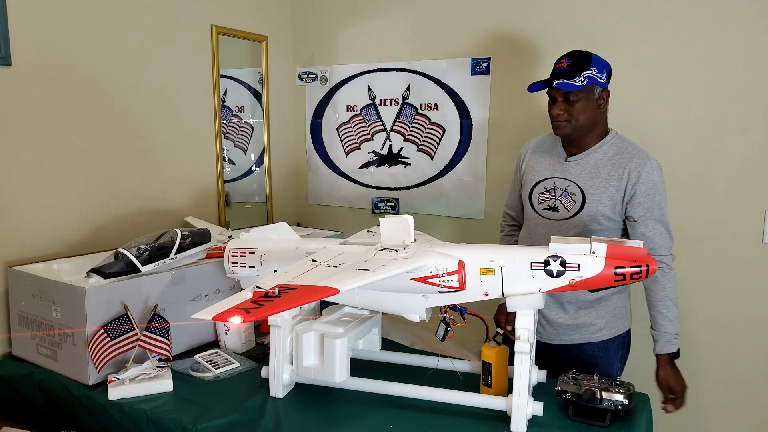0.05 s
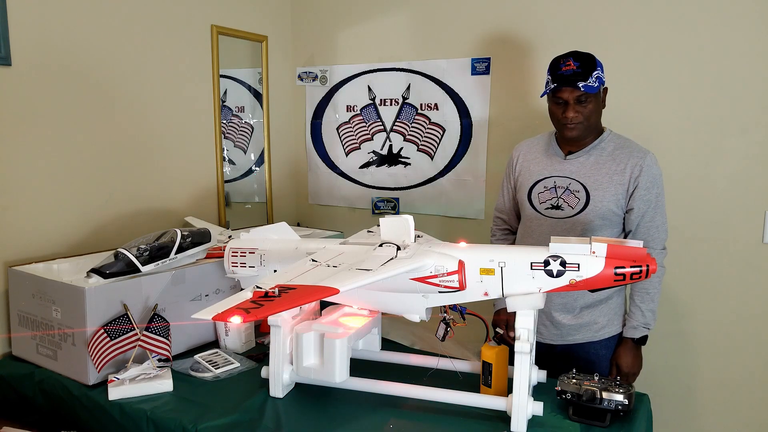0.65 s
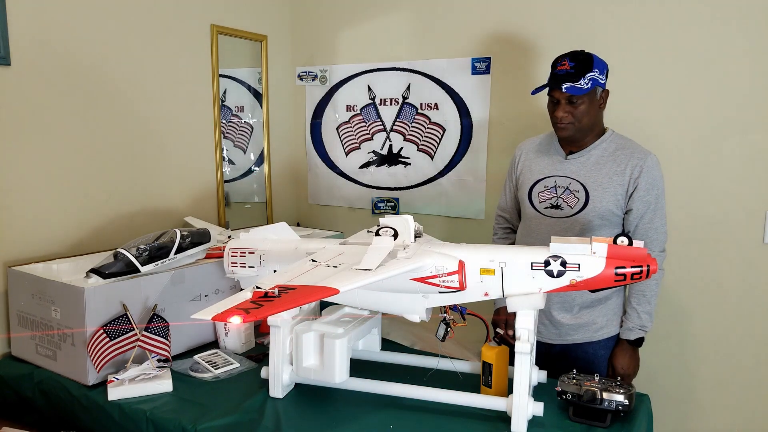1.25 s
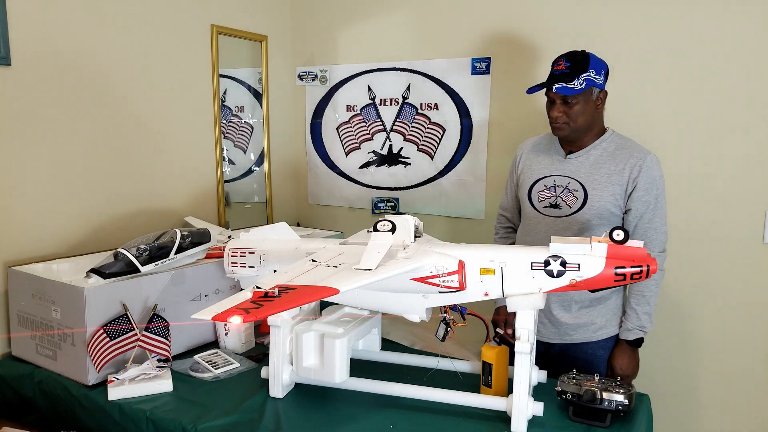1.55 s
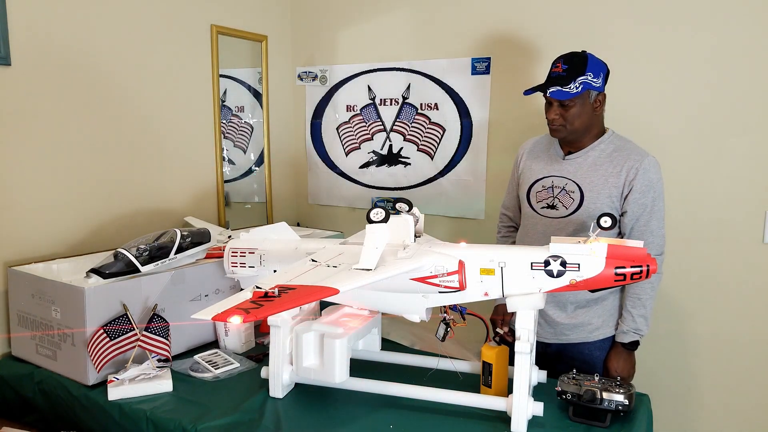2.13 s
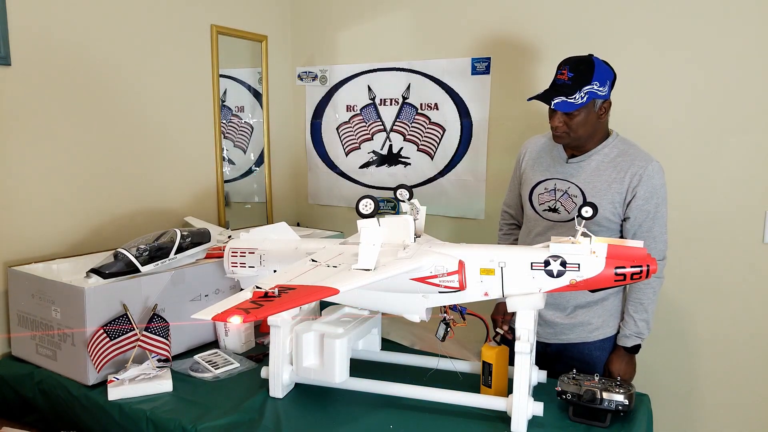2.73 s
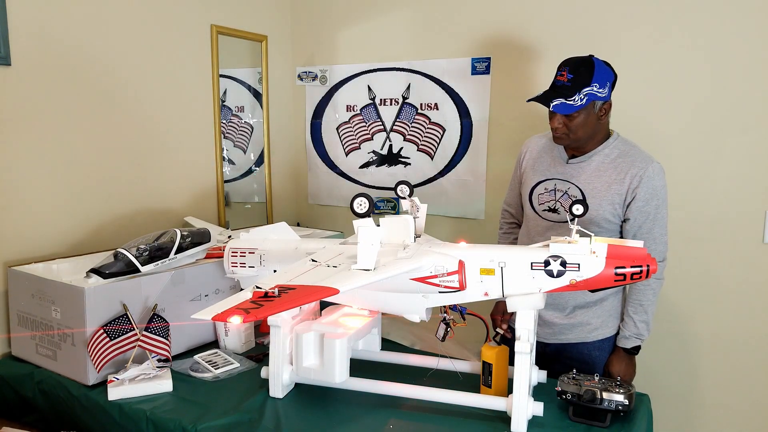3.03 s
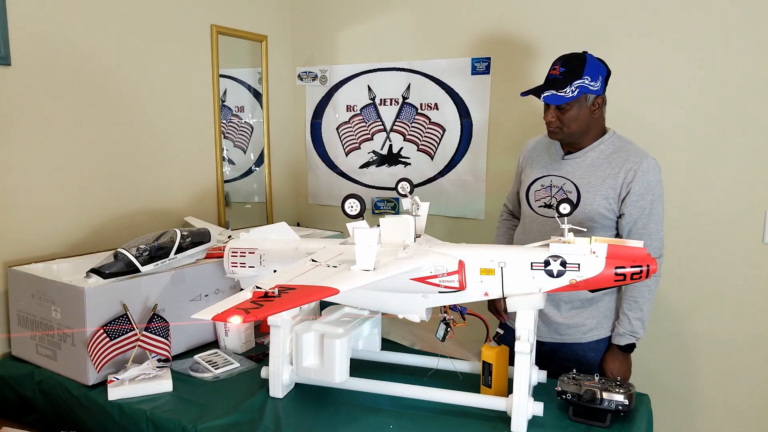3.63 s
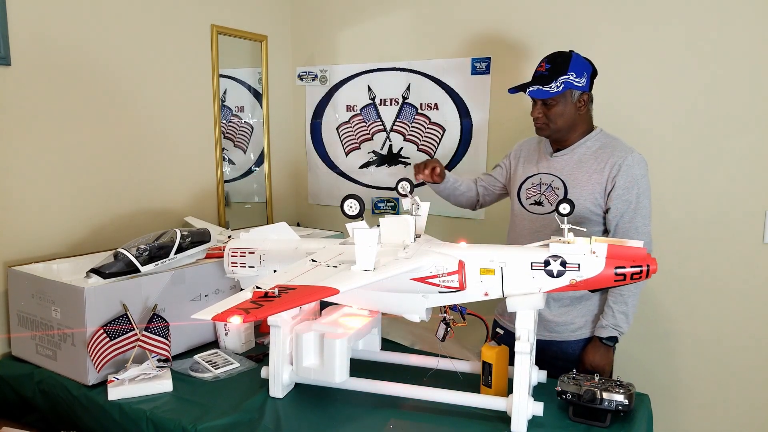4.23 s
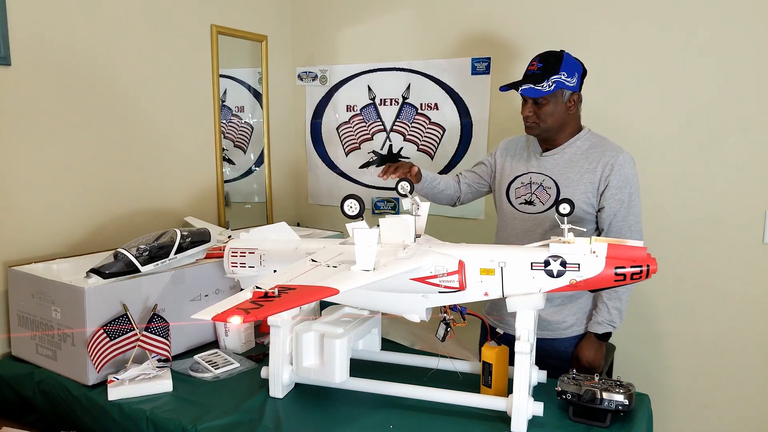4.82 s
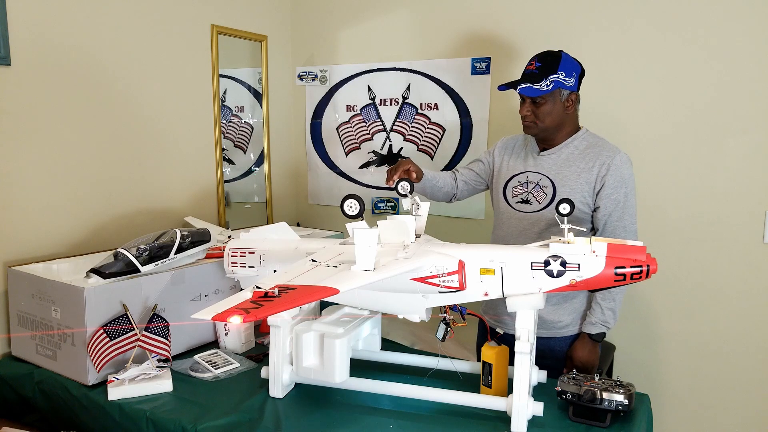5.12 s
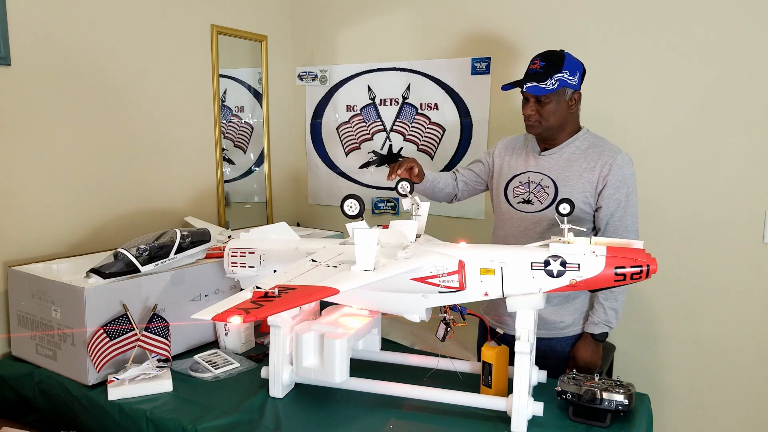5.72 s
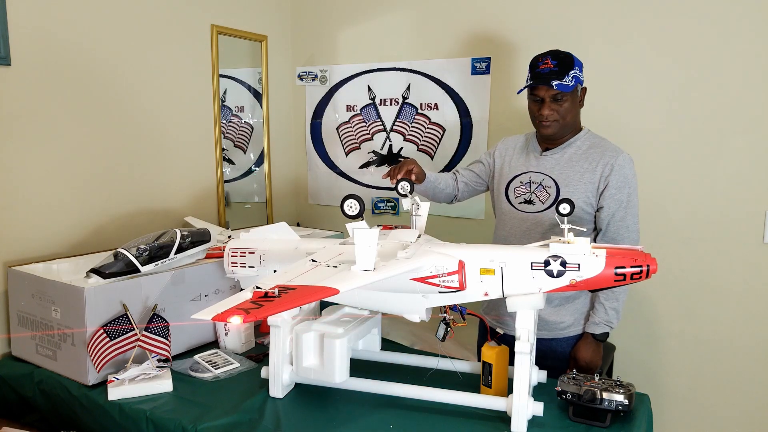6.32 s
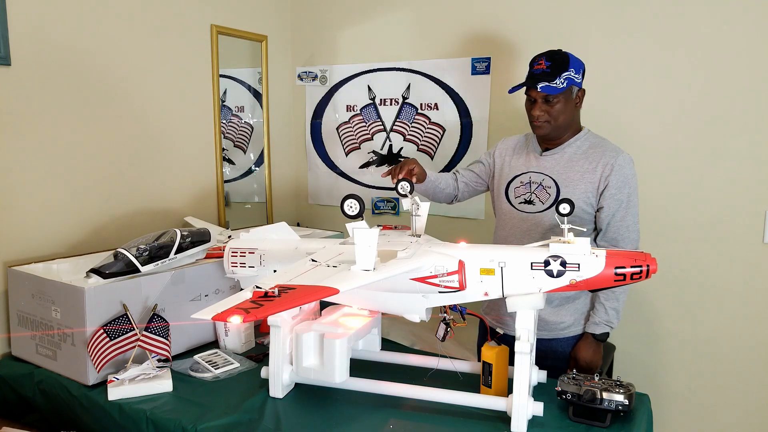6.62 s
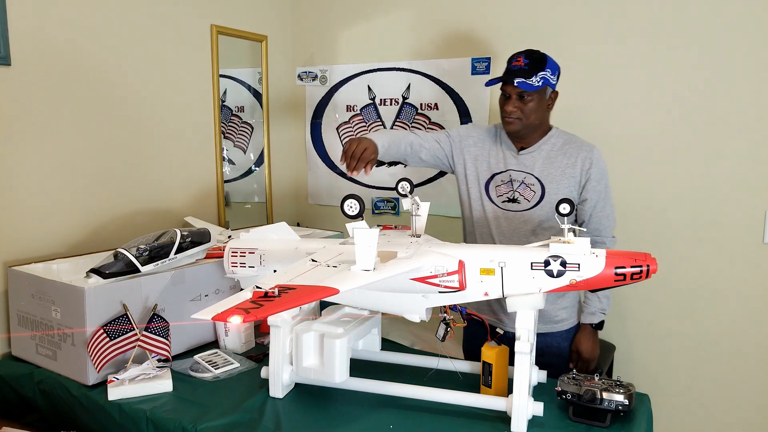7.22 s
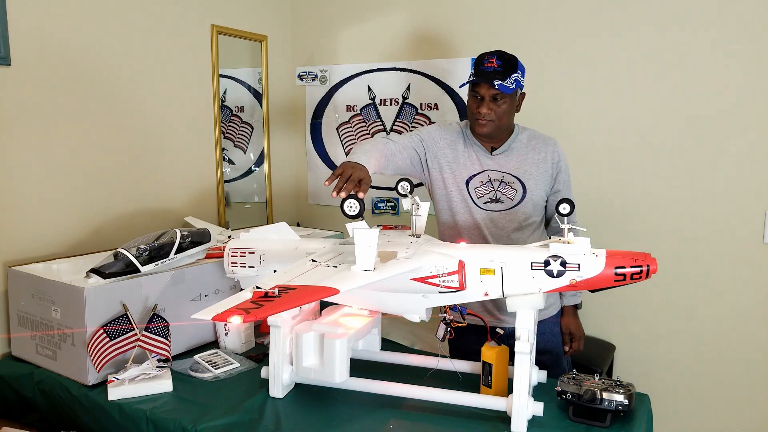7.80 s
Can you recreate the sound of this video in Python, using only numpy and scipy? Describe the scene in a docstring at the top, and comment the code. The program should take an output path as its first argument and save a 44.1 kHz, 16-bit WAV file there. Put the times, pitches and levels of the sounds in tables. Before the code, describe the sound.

In a small room, the landing gear of a foam model plane swings out with a wavering electric whine and a grinding of tiny gears. The motors grow rougher and stop with a scrape and a quick double clack. Next a servo creeps along with a scratchy, pulsing rasp until a door knocks shut. A faint cloth rustle and a light bump follow. The right microphone hears far more than the left.

```python
"""Three small geared motors swing out the legs of a foam model aircraft; their whines beat and sag
under load. The legs scrape home and clack against their stops. A slow servo then rasps as it draws a
gear door shut with a knock; a sleeve rustles and a soft bump follows.
The room is small, and the right microphone hears far more of the aircraft than the left."""
import sys
import numpy as np
from scipy import signal
from scipy.fft import rfft, irfft, next_fast_len
from scipy.io import wavfile
from scipy.ndimage import map_coordinates

SR = 44100
rng = np.random.default_rng(int(sys.argv[2]) if len(sys.argv) > 2 else 0)


def waveform_to_disk(signal):
    """Save audio, clipped to [-1, 1], as 16-bit WAV at the path in sys.argv[1]."""
    frames = np.transpose(np.atleast_2d(signal))
    scaled = np.clip(frames, -1, 1) * 32767
    samples = np.round(scaled).astype(np.int16)
    wavfile.write(sys.argv[1], SR, samples)


N = 351036

# Unloaded shaft speed in Hz, by motor: slow, loud, fast.
IDLE_HZ = {"slow": 333.2, "loud": 340.1, "fast": 354.3}
# Spectrum of a leg rubbing in its mount. Each row: frequency in Hz, relative level in dB.
RUB_SPECTRUM = [(100, -57), (300, -4), (500, -7), (850, -1), (1200, 2), (1600, 0), (2200, -13), (3200, -18),
                (5500, -6), (8000, -41.5)]
FULL_SAG_HZ = 21.5  # mean loss of shaft speed at full load
CUT_S, RUN_DOWN_S = 4.195, 0.081  # motor current is cut


def leg_drives(grind_db=-5, brush_db=-37.0, brush_follow=0.51, hum_db=5, coast_db_per_s=110):
    """Three motors at slightly different speeds beat; their gears grind in time with the shafts."""
    # Gear and motor brush spectra. Each row: frequency in Hz, relative level in dB.
    grind_spectrum = [(150, -25.5), (500, -16.5), (900, -12), (2000, -6.5), (2600, -7.5), (4000, -5),
                      (5800, 2), (6600, -7.5), (8000, -16), (16000, -32)]
    brush_spectrum = [(3000, -48.5), (6500, -5.5), (8000, 0), (9500, 0.5), (12000, 0.5), (14000, 3),
                      (15600, -3)]
    # Envelopes of tooth rattle, shaft hum and its octave. Each row: time in seconds, relative level in dB.
    rattle_levels = [(0.0, -33), (0.44, -32.5), (0.6, -30), (2.58, -24), (3.97, -26), (4.2, -27)]
    hum_levels = [(0.0, -48), (0.85, -42), (1.02, -54), (1.95, -40.5), (2.7, -38), (3.03, -49.5),
                  (3.2, -42.5), (3.9, -44.5), (4.2, -50)]
    octave_levels = [(0, -39.5), (.44, -43), (.55, -50.5), (1.9, -50.5), (2.5, -47), (3.0, -49.5),
                     (3.5, -48), (4.2, -50.5)]
    motors = [motor("slow", flutter=0.0014, orders_db=-0.5, stall_s=4.22),
              motor("loud", flutter=0.0013, orders_db=-1.0, stall_s=4.27),
              motor("fast", flutter=0.0012, orders_db=-1.0, stall_s=4.24)]
    whines, overtones, angles_rad, sags_hz = (np.array(part) for part in zip(*motors))
    tones = whines.sum(0) + filtered(overtones.sum(0), wing_skin)
    load = np.clip(sags_hz.mean(0) / FULL_SAG_HZ, 0, 2)
    shafts = amp([-7, 0, -8]) @ np.cos(angles_rad)
    hum = amp(envelope(hum_levels) + hum_db) * unit(amp(2.0 * wobble(24)) * shafts)
    shaft_octaves = unit(amp([0, -3, -5]) @ np.cos(2 * angles_rad))
    octave = amp(envelope(octave_levels) + 2.3 * wobble(30)) * shaft_octaves
    pressure = (1 + np.cos(angles_rad)) / 2  # teeth press harder once a turn
    contacts = lambda: (pressure ** 2 * rng.standard_normal(pressure.shape)).sum(0)
    rattle_db = envelope(rattle_levels)
    grind = amp(rattle_db + grind_db) * coloured(contacts(), grind_spectrum)
    brush_gain = amp(brush_db + brush_follow * (rattle_db - rattle_db.mean()))
    brushes = brush_gain * coloured(contacts(), brush_spectrum)
    pitched = tones + hum + octave + gear_whistles(angles_rad, load)
    powered = 1 - ramp(CUT_S, RUN_DOWN_S)
    coasting = amp(-coast_db_per_s * since(CUT_S))
    return pitched * powered + grind * coasting + brushes * coasting ** 2


def motor(name, flutter, orders_db, stall_s, jitter=0.0015, waver_db=1.7, mesh_db=2.5, chatter_db=2.0):
    """A three-pole armature whines at three times shaft speed; the gear mesh adds higher orders."""
    # Whine envelope, by motor. Each row: time in seconds, level in dB.
    whine_levels = {"slow": [(0, -24.5), (.38, -24), (.65, -31.5), (.92, -35), (1.12, -38), (1.7, -32.5),
                    (2.0, -30.5), (2.26, -26), (2.6, -37.5), (2.85, -28.5), (3.17, -32), (3.28, -26),
                    (3.88, -27.5), (4.2, -37.5)], "loud": [(0, -34), (.25, -24.5), (.47, -24), (.52, -29),
                    (.553, -14), (.59, -19.5), (.78, -12.5), (1.18, -19.5), (1.38, -16), (1.66, -17.5),
                    (1.87, -16), (2.1, -18), (2.28, -14), (2.43, -21), (2.57, -14.5), (2.77, -22),
                    (3.1, -19.5), (3.3, -21), (3.95, -23.5), (4.005, -13), (4.04, -25), (4.2, -31)],
                    "fast": [(0, -29), (.45, -29), (.62, -24), (.85, -33), (1.05, -33.5), (1.3, -23.5),
                    (1.65, -24.5), (1.9, -24.5), (2.06, -28), (2.4, -30.5), (2.6, -28), (3.15, -33.5),
                    (3.5, -23.5), (3.85, -25.5), (4.2, -26.5)]}
    # Overtones. Each row: shaft order (consecutive from 4), relative dB in the slow, loud, fast motor.
    orders = [(4, -34.5, -37.5, -38.5), (5, -43.5, -44, -44.5), (6, -35.5, -33, -32),
              (7, -37.5, -38.5, -45.5), (8, -44, -46, -47.5), (9, -36.5, -33.5, -37), (10, -46, -46, -42.5),
              (11, -41.5, -38.5, -39.5), (12, -41.5, -40, -34.0), (13, -45.5, -37, -36.5),
              (14, -43, -39, -39.5), (15, -45.0, -42.5, -40), (16, -44.0, -41.5, -40),
              (17, -39.5, -36.5, -40.5), (18, -36.5, -40.0, -41), (19, -42.5, -46.5, -57)]
    # Pressure on the gear teeth. Each row: time in seconds, gain in dB.
    tooth_pressure = [(0, -5.5), (.3, -6.5), (.7, -2.5), (1.8, -1.5), (2.0, 0), (2.45, 0.5), (2.65, 3),
                      (2.95, 0), (3.5, 0), (3.9, -0.5), (4.1, -2.5)]
    shaft_hz = shaft_speed(name)
    sag_hz = IDLE_HZ[name] - shaft_hz
    roughness = jitter * (1 + 0.72 * sag_hz / FULL_SAG_HZ)
    speed_hz = shaft_hz * (1 + flutter * wobble(22) + roughness * wobble(170))
    turn = np.exp(2j * np.pi * np.cumsum(speed_hz) / SR).astype(np.complex64)
    drive = np.clip((stall_s - np.arange(N) / SR) / 0.18, 0, 1)
    pressing = amp(envelope(tooth_pressure))
    # The mesh shifts as the leg swings, so orders swell and fade unevenly.
    meshes = [drive * unit(amp(mesh_db * wobble(4) + chatter_db * wobble(45))) for _ in range(7)]
    partial = lambda phasor: np.sqrt(2) * (phasor * np.exp(2j * np.pi * rng.random())).real
    phasor = turn * turn * turn
    whine = amp(envelope(whine_levels[name]) + waver_db * wobble(60)) * partial(phasor)
    column = list(IDLE_HZ).index(name)
    overtones = 0
    for k, (order, *levels_db) in enumerate(orders):
        phasor = phasor * turn
        mesh = meshes[k % len(meshes)]
        contact = mesh * pressing if order >= 10 else mesh  # high orders come from the teeth
        overtones = overtones + amp(levels_db[column] + orders_db) * contact * partial(phasor)
    return whine, overtones, np.angle(turn), sag_hz


def shaft_speed(name):
    """Shaft speed in Hz: load drags it down, then it climbs back, at most to idle, or sinks further."""
    # Each row: motor, start in seconds, sag time in seconds, dragged speed in Hz, drift in Hz/s.
    strains = [("slow", 0.42, .24, 317.2, 2.5), ("loud", 0.455, 0.0899, 324, 4.8),
               ("fast", 0.44, .11, 332, 6.6), ("fast", 1.87, .1, 321.3, 16.8),
               ("loud", 1.9, .12, 322.6, 11.3), ("slow", 1.93, .2, 313.8, 7.4),
               ("slow", 3.25, .3, 325.6, -1), ("fast", 3.74, .26, 337, -24), ("loud", 3.86, .13, 329, -11),
               ("slow", 3.96, 0.22, 326.0, -4.5)]
    shaft_hz = np.full(N, float(IDLE_HZ[name]))
    for who, start_s, sag_s, dragged_hz, drift_hz_per_s in strains:
        if who == name:
            strained_hz = np.minimum(dragged_hz + drift_hz_per_s * since(start_s + sag_s), IDLE_HZ[name])
            shaft_hz = shaft_hz + ramp(start_s, sag_s) * (strained_hz - shaft_hz)
    return shaft_hz


def gear_whistles(angles_rad, load, gain_db=-5, load_db=7, bite_db=3, backlash_deg=1.0, fade_s=0.15):
    """Thin high orders grow with load; slack between the teeth blurs them into a sizzle."""
    # Each row: shaft order, relative level in dB in the slow, loud and fast motor.
    orders = [(21, -52.5, -52, -52.5), (24, -50, -48.5, -48), (27, -59.5, -56, -55),
              (30, -56.5, -59.5, -56.5), (33, -60, -54, -59), (36, -41, -45.5, -41), (37, -54, -57, -64.5),
              (39, -53, -51, -59.5), (42, -56.5, -58.5, -60.5), (45, -62, -54, -62.5), (46, -66, -56, -64),
              (48, -45.5, -45, -55)]
    play_rad = np.radians(backlash_deg) * np.array([wobble(430) for _ in angles_rad])
    shaken_rad = (angles_rad + play_rad).astype(np.float32)
    partials = sum(np.sqrt(2) * amp(levels_db) @ np.cos(round(order) * shaken_rad)
                   for order, *levels_db in orders)
    biting = ramp(0.5, 0.07) - ramp(0.6, 0.063)  # legs break out of their wells
    fading = 1 - ramp(CUT_S - fade_s, fade_s)
    return amp(gain_db + load_db * load + bite_db * biting + 2.1 * wobble(12)) * partials * fading


def wing_skin(hz):
    """Gain of the wing skin: orders swell as they glide through its narrow resonances."""
    # Each row: centre in Hz, width in Hz, boost in dB.
    modes = [(1773, 50, 6.5), (2019, 60, 6), (2490, 60, 3), (3396, 64, 4.5), (3520, 60, 3.5), (3960, 50, 4),
             (4140, 50, 3.5), (4736, 78, 7), (5080, 110, 6.5), (5270, 140, 5), (5905, 190, 4.5)]
    return amp(sum(db / (1 + (2 * (hz - centre_hz) / width_hz) ** 2) for centre_hz, width_hz, db in modes))


def leg_scrape(gain_db=13, sliding_db=-64, uneven_db=3):
    """The swinging legs stick and slip in their mounts, most of all near the stops."""
    # Each row: peak time in seconds, relative level in dB, release in seconds.
    catches = [(0.46, -45.5, 0.093), (1.66, -62.5, 0.1), (2.34, -57.5, 0.049), (2.64, -53, 0.049),
               (3.23, -53, 0.054), (3.74, -52.5, 0.062), (3.99, -43.5, 0.088), (4.13, -45, 0.1),
               (4.28, -55, 0.016)]
    swinging = ramp(catches[0][0], 0.03) - ramp(CUT_S, RUN_DOWN_S)
    friction = amp(sliding_db + uneven_db * wobble(10)) * swinging + swells(catches, attack_s=0.01)
    return amp(gain_db) * friction * coloured(grains(rate_hz=1400, spread_db=0.5), RUB_SPECTRUM)


def leg_clacks(ring_t60_s=0.13, crack_t60_s=0.033, crack_db=-7, attack_s=0.0012):
    """A leg hits its stop with a short crack, and its strut rings."""
    # Each row: start in seconds, level in dB, ring frequency in Hz.
    hits = [(4.123, -22, 1154), (4.188, -30, 2240)]
    clacks, t = np.zeros(N), np.arange(SR // 3) / SR
    noise = coloured(rng.standard_normal(N), RUB_SPECTRUM)
    for start_s, db, hz in hits:
        span = slice(round(start_s * SR), round(start_s * SR) + len(t))
        ring_gain = amp(-60 * t / ring_t60_s) * (1 - np.exp(-t / attack_s))
        ring = np.sqrt(2) * np.sin(2 * np.pi * hz * t) * ring_gain
        crack = amp(crack_db - 60 * t / crack_t60_s) * noise[span]
        clacks[span] += amp(db) * (ring + crack)
    return clacks


def door_servo(free_s=4.61, on_s=4.765, off_s=6.803, spin_up_s=0.046, stop_db_per_s=200,
               rasp_db=-34, ease_db_per_s=-2.0, surge=0.41, surge_s=0.04, easy_db=-4,
               tick_db=-12, slack_db=-54, sliding_db=-57, panel_db=6.0):
    """A creeping servo makes tiny uneven steps; it surges at the start and strains as the door catches."""
    # Servo and linkage spectra. Each row: frequency in Hz, relative level in dB.
    servo_spectrum = [(300, -34.5), (1500, -17.5), (2300, -16), (2900, -8), (4000, -4), (5000, -1),
                      (6000, -3.5), (6800, -19.5), (9000, -23.5), (12000, -17), (15600, -15.5)]
    linkage_spectrum = [(300, -22.5), (1500, -10.5), (2500, -8.5), (3200, -2), (4500, 0), (6000, -3.5),
                        (7000, -23.5), (15000, -24)]
    # The door catches on the foam.
    # Each row: peak time in seconds, servo strain and panel rattle in relative dB, release in seconds.
    catches = [(4.69, -51.5, -55.5, 0.12), (4.99, -41.5, -62.5, .05), (5.3, -50.5, -70, 0.038),
               (5.46, -54, -56, .03), (5.655, -39, -58.5, 0.032), (5.76, -43.5, -50, 0.024),
               (5.87, -44.5, -55, 0.048), (5.975, -40.5, -60, 0.017), (6.1, -39.5, -55.5, 0.023),
               (6.15, -49.5, -53.5, 0.024), (6.195, -40, -49, 0.011), (6.315, -40, -50.5, 0.045),
               (6.41, -49, -55.5, 0.026), (6.53, -40, -54.5, 0.03), (6.645, -36, -50, 0.051),
               (6.73, -46.5, -51, 0.064)]
    stopping = amp(-stop_db_per_s * since(off_s))
    free = ramp(free_s, 0.01) * stopping
    pulling = ramp(on_s - spin_up_s, spin_up_s) ** 2 * stopping
    strain = swells([(s, db, release_s) for s, db, _, release_s in catches], attack_s=0.041)
    rattle = swells([(s, db, release_s) for s, _, db, release_s in catches], attack_s=0.0122)
    pulled_s = since(on_s)
    easy = ramp(5.56, 0.03) - ramp(5.635, 0.01)  # door swings easily for a moment
    surging = 1 + surge * np.exp(-pulled_s / surge_s)
    effort = amp(rasp_db + ease_db_per_s * pulled_s + easy_db * easy) * surging + strain
    ticks = coloured(grains(rate_hz=300, spread_db=1.0), linkage_spectrum)
    slack = coloured(grains(rate_hz=4000, spread_db=1.5), linkage_spectrum)  # linkage slides faintly
    steps = grains(rate_hz=5000, spread_db=1.0) * amp(1.8 * wobble(70) + 0.73 * wobble(16))
    rasp = effort * pulling * (coloured(steps, servo_spectrum) + amp(tick_db) * ticks)
    rub = amp(panel_db) * (amp(sliding_db) * free + rattle) * door_panel()
    return rasp + amp(slack_db) * free * slack + rub


def door_panel(stick_db=3.5):
    """The panel sticks at a new spot each time, so each resonance flares by itself."""
    # Each row: centre in Hz, width in Hz, relative level in dB.
    modes = [(575, 110, -7), (719, 91, -6), (968, 104, 0), (1380, 160, -6.5), (1970, 140, -1.5)]
    slips = 0
    for centre_hz, width_hz, db in modes:
        flare = amp(db + stick_db * wobble(24))
        slips += flare * resonating(grains(rate_hz=1700, spread_db=0.0), [(centre_hz, width_hz, 0)])
    return unit(slips)


def airframe_knocks(attack_s=0.0031, t60_s=0.2):
    """Soft contacts chatter briefly and ring the foam airframe."""
    # Each row: start in seconds, level in dB.
    hits = [(4.122, -38), (4.172, -33.5), (4.607, -48), (4.68, -47.5), (6.319, -44.5), (6.637, -25.5),
            (6.736, -33), (7.898, -48), (7.916, -44.5), (7.93, -45)]
    # Each row: centre in Hz, width in Hz, relative level in dB.
    foam_modes = [(504, 390, -3), (698, 320, 1.5), (900, 124, 4.5), (1190, 310, -9), (1530, 220, -10.5),
                  (2135, 830, -13.5)]
    t = np.arange(SR // 3) / SR
    force = np.zeros(N + SR)
    for start_s, db in hits:
        force[round(start_s * SR):][:len(t)] += amp(db - 60 * t / t60_s) * (1 - np.exp(-t / attack_s))
    return force[:N] * resonating(rng.standard_normal(N), foam_modes)


def sleeve(gain_db=6):
    """Cloth fibres slide over each other as an arm is drawn back."""
    # Each row: peak time in seconds, relative level in dB, release in seconds.
    strokes = [(7.23, -66.5, .05), (7.29, -57.5, 0.056), (7.41, -67.5, .05), (7.49, -75, 0.048)]
    # Each row: frequency in Hz, relative level in dB.
    cloth_spectrum = [(600, -35), (1500, -8), (2000, -6), (2700, -5), (3100, 1), (3600, -2), (4500, -2),
                      (5900, 0.5), (6800, -26.5), (15000, -27)]
    rustle = coloured(grains(rate_hz=7400, spread_db=1.0), cloth_spectrum)
    return amp(gain_db) * swells(strokes, attack_s=0.035) * rustle


def room_echoes(x):
    """The walls answer each microphone differently; the treble dies first."""
    # Each row: frequency in Hz, T60 in seconds.
    decay_times = [(200, 0.97), (1000, 0.8), (2200, 0.64), (5000, 0.56), (7500, 0.27), (15000, 0.18)]
    hz, t, noise = signal.stft(rng.standard_normal((2, SR * 2 // 3)), SR, nperseg=256)
    decay = amp(-60 * t / along(decay_times, hz)[:, None])
    _, tail = signal.istft(noise * decay, SR, nperseg=256)
    delayed = np.pad(x, (200, 0))[None]
    return signal.fftconvolve(delayed, tail / np.linalg.norm(tail[0]), axes=1)[:, :N]


def room_tone(level_db=-62.5):
    """Quiet room air with microphone hiss."""
    # Each row: frequency in Hz, relative level in dB.
    air_spectrum = [(20, -10.5), (45, -11.5), (80, -2), (130, 2), (220, -13), (500, -18), (1000, -21),
                    (3000, -24), (6000, -22.5), (8000, -28), (13500, -24), (15300, -20.5)]
    return amp(level_db) * amp([[-1], [1]]) * coloured(rng.standard_normal((2, N)), air_spectrum)


def amp(db):
    """Decibels to gain."""
    return 10 ** (np.asarray(db) / 20)


def unit(x):
    """Scale to rms 1."""
    return x / np.sqrt(np.mean(np.abs(x) ** 2) + 1e-20)


def along(points, hz):
    """Interpolate (Hz, value) points on a log frequency axis."""
    points_hz, values = np.transpose(points)
    return np.interp(np.log(hz + 1), np.log(points_hz + 1), values)


def envelope(points):
    """Interpolate (seconds, value) points at every sample."""
    return np.interp(np.arange(N) / SR, *np.transpose(points))


def ramp(start_s, length_s):
    """Linear rise from 0 to 1."""
    return np.clip((np.arange(N) / SR - start_s) / max(length_s, 1e-4), 0, 1)


def since(start_s):
    """Seconds since start_s, 0 before it."""
    return np.maximum(np.arange(N) / SR - start_s, 0)


def swells(strokes, attack_s):
    """Summed gain of strokes that rise to a peak and die away."""
    return sum(amp(db) * ramp(peak_s - attack_s, attack_s) * np.exp(-since(peak_s) / max(release_s, 0.005))
               for peak_s, db, release_s in strokes)


def wobble(rate_hz):
    """Smooth random curve, rate_hz knots a second."""
    knots = rng.standard_normal(int(N * rate_hz / SR) + 4)
    coarse = np.arange(0, N + 32, 32)
    return np.interp(np.arange(N), coarse, map_coordinates(knots, [coarse * rate_hz / SR]))


def grains(rate_hz, spread_db):
    """Tiny contacts of random time and size, at rms 1."""
    chance, size = rng.random(N), rng.standard_normal(N)
    return unit((chance < rate_hz / SR) * np.sign(rng.standard_normal(N)) * amp(spread_db * size))


def filtered(x, response):
    """x through a gain given as a function of Hz."""
    size = next_fast_len(N + SR // 4)
    return irfft(rfft(x, size) * response(np.fft.rfftfreq(size, 1 / SR)), size)[..., :N]


def coloured(x, spectrum):
    """x through a (Hz, dB) spectrum, at rms 1."""
    return unit(filtered(x, lambda hz: amp(along(spectrum, hz))))


def resonating(x, modes):
    """x through (centre Hz, width Hz, dB) resonances of alternating sign, at rms 1."""
    def body(hz):
        return sum((-1) ** k * amp(db) * 1j * hz * width / (centre ** 2 - hz ** 2 + 1j * hz * width)
                   for k, (centre, width, db) in enumerate(modes))
    return unit(filtered(x, body))


def scene():
    """Bass reaches both microphones directly; the left hears treble weakly and mostly from the walls."""
    # Share of power on the direct path. Each row: frequency in Hz, left share, right share.
    direct_shares = [(326, 0.94, 0.94), (980, 0.14, 0.91), (4000, 0.075, 0.71), (10020, 0.028, 0.65)]
    # Each row: frequency in Hz, gain of the left channel in dB.
    left_response = [(100, -8), (330, -10.5), (680, -16.5), (1000, -16), (2000, -18), (4400, -20),
                     (6000, -24.5), (8000, -11), (10000, -2.5), (12000, -9), (15000, -19)]
    sources = leg_drives() + leg_scrape() + leg_clacks() + door_servo() + airframe_knocks() + sleeve()
    left_share = [(hz, left) for hz, left, _ in direct_shares]
    right_share = [(hz, right) for hz, _, right in direct_shares]
    share = lambda hz: np.clip([along(left_share, hz), along(right_share, hz)], 0, 1)
    direct = filtered(sources, lambda hz: np.sqrt(share(hz)))
    echoes = filtered(room_echoes(sources), lambda hz: np.sqrt(1 - share(hz)))
    left, right = direct + echoes
    left = filtered(left, lambda hz: amp(along(left_response, hz)))
    return np.array([left, right]) + room_tone()


def record(dry):
    """Brick-wall low-pass."""
    cutoff_hz = 15780
    return filtered(dry, lambda hz: hz < cutoff_hz)


dry = scene()
out = record(dry)
waveform_to_disk(out)
```